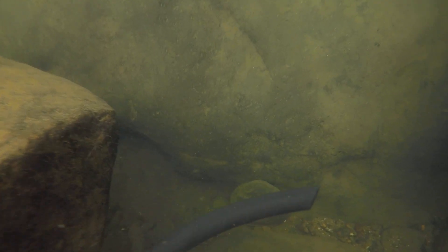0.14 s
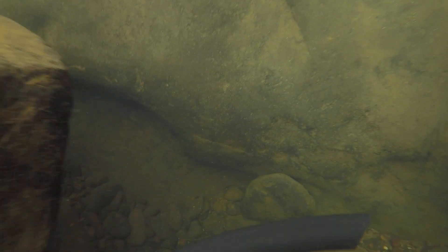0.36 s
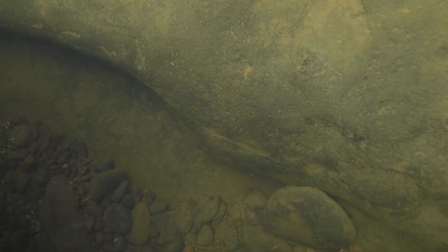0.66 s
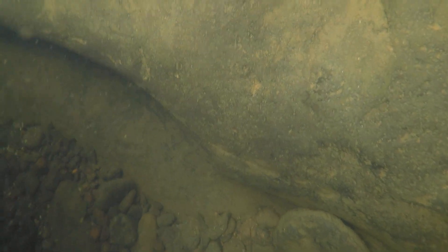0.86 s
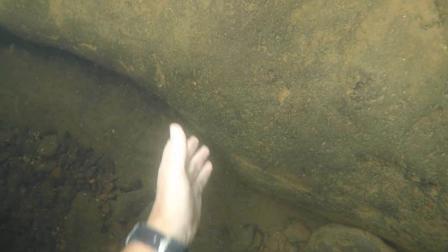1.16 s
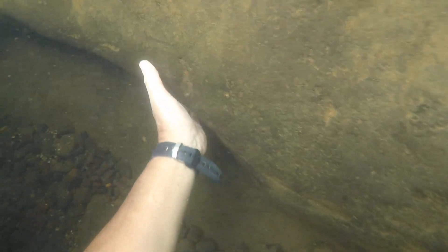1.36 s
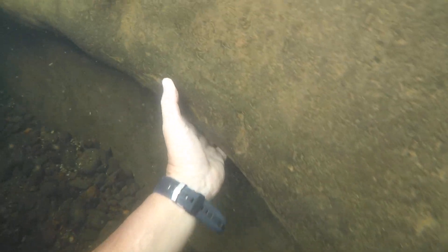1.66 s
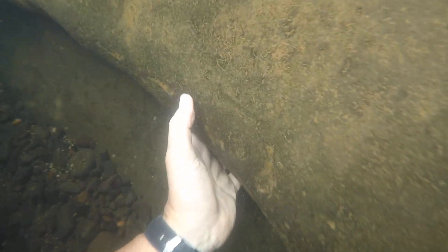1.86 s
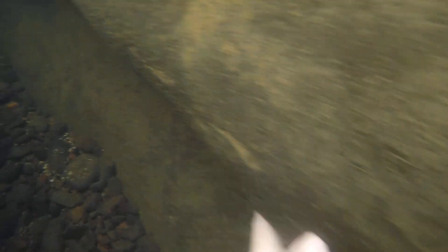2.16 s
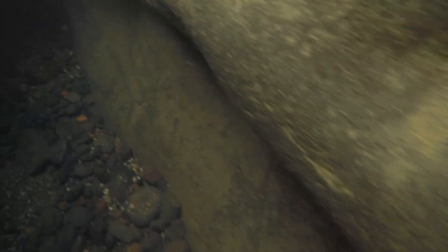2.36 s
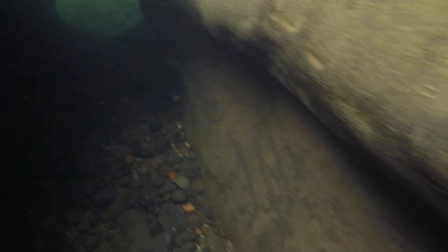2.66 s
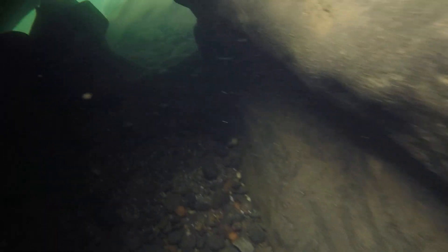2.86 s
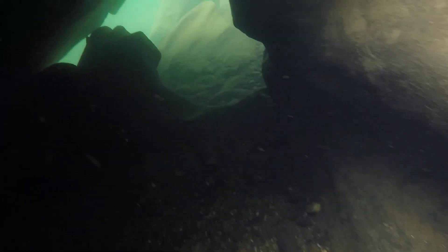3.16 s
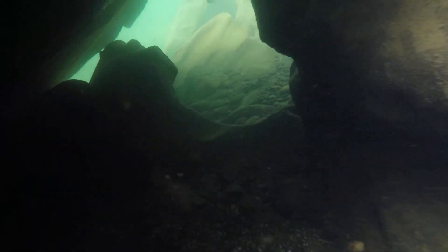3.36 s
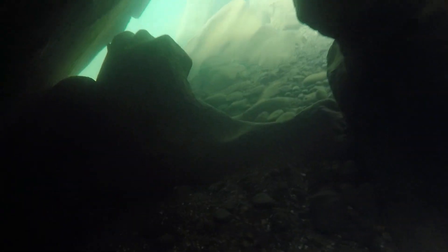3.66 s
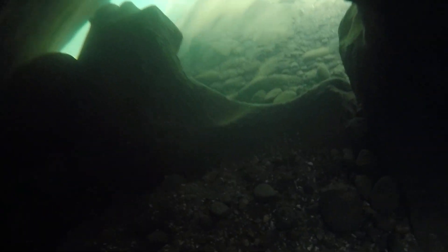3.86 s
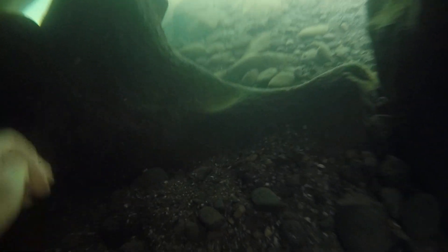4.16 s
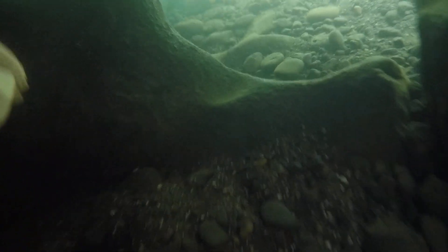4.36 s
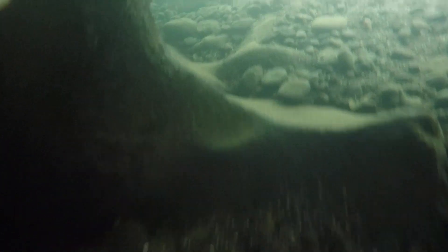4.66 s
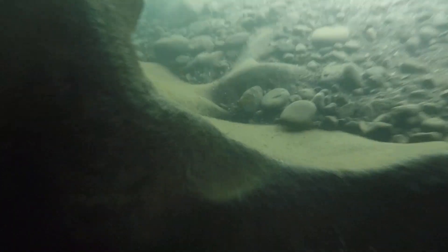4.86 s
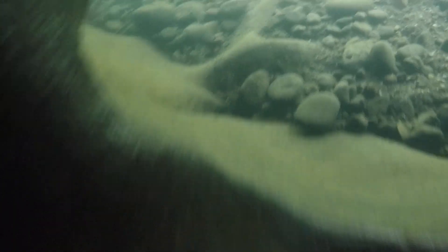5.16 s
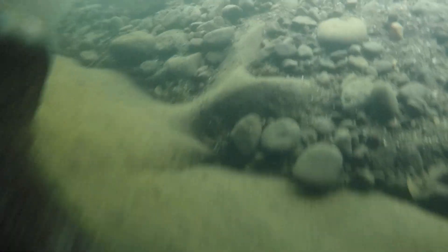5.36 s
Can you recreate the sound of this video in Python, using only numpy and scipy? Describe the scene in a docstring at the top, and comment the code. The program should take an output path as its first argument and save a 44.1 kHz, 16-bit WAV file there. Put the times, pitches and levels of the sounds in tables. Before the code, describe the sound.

Underwater inside a sealed housing: low river turbulence, bubbling gurgles and hollow bumps, quiet at first, then crowded with hard clacks and deep thuds.

```python
"""A camera in a sealed housing is carried under water through a river current between boulders.
From the start, coloured noise makes the turbulence rumble and hiss while damped sines gurgle in the flow.
Knocks ring the air pockets as damped sines and scrape as noise through shell modes; grit soon ticks on the port.
The hiss later changes colour. Both channels share all but the highest hiss at first, then the sound widens
once a hand works on the housing."""
import sys
import numpy as np
from scipy import signal
from scipy.fft import rfft, irfft
from scipy.io import wavfile
from scipy.ndimage import uniform_filter1d

SR = 44100
rng = np.random.default_rng(int(sys.argv[2]) if len(sys.argv) > 2 else 0)


def waveform_to_disk(signal):
    """Save audio, clipped to [-1, 1], as 16-bit WAV at the path in sys.argv[1]."""
    frames = np.transpose(np.atleast_2d(signal))
    scaled = np.clip(frames, -1, 1) * 32767
    samples = np.round(scaled).astype(np.int16)
    wavfile.write(sys.argv[1], SR, samples)


N = 242991
T = np.arange(N) / SR  # s
HZ = np.maximum(np.arange(N // 2 + 1) * SR / N, 1)  # frequency axis, kept above zero for logarithms


def undb(db):
    """Decibels to gain."""
    return 10 ** (np.asarray(db) / 20)


def shape(table):
    """Gain on the frequency axis, drawn through (f/Hz, level/dB) points on a log frequency scale."""
    hz, db = np.transpose(table)
    return undb(np.interp(np.log(HZ), np.log(np.maximum(hz, 1)), db))


def automation(table):
    """Curves over the whole scene from a table whose first column is t/s."""
    s, *columns = np.transpose(table)
    return [np.interp(T, s, column) for column in columns]


def decay(x, seconds):
    """One-pole tail: each impulse dies away exponentially with this time constant."""
    return signal.lfilter([1], [1, -np.exp(-1 / (seconds * SR))], x)


def walk(rate):
    """Random levels held 1 / rate s and slewed twice; spread near 1."""
    hold = int(SR / rate)
    steps = np.repeat(rng.standard_normal(N // hold + 1), hold)
    return 1.4 * uniform_filter1d(uniform_filter1d(steps, hold), hold)[:N]


def eddies(spectrum_gain, lo_hz, hi_hz, flicker_db, rate):
    """Turbulence as coloured noise, rms 1, whose five overlapping bands flicker each on its own."""
    spectrum = rfft(rng.standard_normal(N)) * spectrum_gain
    centres = np.geomspace(lo_hz, hi_hz, num=5)
    step = np.log(centres[1] / centres[0])
    out = 0
    for hz in centres:
        band = np.clip(1 - np.abs(np.log(HZ / hz)) / step, 0, 1)
        out = out + irfft(spectrum * band, N) * undb(flicker_db * walk(rate))
    return out / np.sqrt(np.mean(out ** 2))


def add(out, s, db, hz, t60, rise, pan_db=0.):
    """Adds one damped sine with a rounded onset, cut after at most 0.6 s, to both channels."""
    t = np.arange(int(min(t60, .6) * SR) + 2) / SR
    env = (1 - np.exp(-t / rise)) ** 2 * np.exp(-np.log(1000) * t / t60)
    ring = undb(db) * env / env.max() * np.sin(2 * np.pi * hz * t)
    i = int(s * SR)
    panned = ring * undb([[pan_db / 2], [-pan_db / 2]])
    out[:, i:i + len(t)] += panned[:, :N - i]


# a ridge in the hiss slides down, rises briefly and swells, then sinks and fades:
# t/s, f/Hz, level/dB against the hiss
HISS_RIDGE = [(0, 9800, 0), (.2, 9000, -1.5), (.4, 8100, -15), (1.3, 7970, -15), (2.1, 8100, -11),
              (2.25, 8400, -6), (2.4, 8100, -27), (3.1, 7650, -30)]


def ridge():
    """Slow noise shifted up to a moving centre frequency: a narrow band within the hiss."""
    hz, db = automation(HISS_RIDGE)
    slow = irfft(rfft(rng.standard_normal((2, N))) / (1 + (HZ / 520) ** 2), N)
    phase = 2 * np.pi * np.cumsum(hz) / SR
    return undb(db) * (slow[0] * np.cos(phase) + slow[1] * np.sin(phase)) / np.std(slow)


# colour of the hiss before and after the change: f/Hz, relative level/dB per Hz
HISS_BEFORE = [(1530, 0.5), (2600, -3.5), (2760, -7), (3000, -8.5), (3280, -10.5), (4620, -6.5),
               (7740, -8.5), (8460, -13), (9610, -9.5), (12000, -19.5), (13900, -24), (15500, -50)]
HISS_AFTER = [(1530, 9.5), (2600, -2), (3020, -4), (3580, -7), (3920, -4), (4620, -5.5), (6820, -1.5),
              (8210, -6.5), (9830, -6), (13200, -16), (15500, -25)]
COLOUR_CHANGE_S = (3.06, 3.38)


def hiss():
    """Fine turbulence: two noise colours crossfaded at equal power, with the ridge on top."""
    after = np.interp(T, COLOUR_CHANGE_S, [0, 1])
    out = np.sqrt(1 - after) * eddies(shape(HISS_BEFORE), 2100, 19000, 0.96, 8.9)
    out = out + np.sqrt(after) * eddies(shape(HISS_AFTER), 1700, 24000, 0.57, 12.0)
    return out + ridge()


# slowest pressure swings: f/Hz, relative level/dB per Hz
SWAY_COLOUR = [(4.7, -39), (8.0, 0), (27, -5), (50, -13.5), (65, -18.5), (110, -120)]


def sway():
    """The deepest turbulence, mostly below 50 Hz."""
    return eddies(shape(SWAY_COLOUR), 7.8, 60, 0.67, 15.0)


# turbulence on the shell: f/Hz, relative level/dB per Hz
RUMBLE_COLOUR = [(24, -43), (40, -4.5), (105, -6), (260, -20.5), (340, -26), (570, -120)]


def rumble():
    """Low turbulence on the shell, with the strongest flicker."""
    return eddies(shape(RUMBLE_COLOUR), 12.3, 465, 2.83, 8)


# middle of the flow noise: f/Hz, relative level/dB per Hz
RUSH_COLOUR = [(88, 14), (150, -4), (269, -9), (304, -7), (435, -8.5), (471, -12.5), (552, -11), (639, -18),
               (701, -14.5), (1600, -22), (3600, -43), (4680, -82), (7920, -120)]


def rush():
    """Middle-pitched turbulence of the flow."""
    return eddies(shape(RUSH_COLOUR), 150.5, 4100, 1.16, 19)


GURGLE_PER_S, BLIP_SHARE = 160, .25  # mean density; share of gurgles that also blip higher


def gurgle():
    """Air pockets ring as damped sines at random times, pitches and sizes; rms 1."""
    out = np.zeros((2, N))
    for when, pitch, size, blip in rng.random((int(GURGLE_PER_S * N / SR), 4)):
        s = when * N / SR
        add(out, s, 13.4 * size, 400 + 260 * pitch, .06, .003)
        if blip < BLIP_SHARE:
            add(out, s, 12. * pitch - 6, 900 + 900 * size, .03, .0015)
    return out[0] / np.sqrt(np.mean(out ** 2))


# flow past the shell: t/s, hiss level/dB, rush level/dB
FLOW_LEVELS = [(0, -80, -60), (.4, -71, -56.5), (.9, -64.5, -45), (1.5, -58.5, -44.5), (2.1, -58.5, -41),
               (2.9, -58.5, -42.5), (3.7, -57.5, -42), (4.1, -59, -43), (4.4, -58, -39.5),
               (4.7, -57, -40.5), (4.83, -60.5, -37), (5, -60.5, -46.5), (5.25, -59, -39.5),
               (5.51, -59, -40.5)]
# buffeting of the housing: t/s, sway level/dB, rumble level/dB
BUFFET_LEVELS = [(0, -50.5, -56), (.4, -44, -49), (.85, -39, -38.5), (1.05, -36, -33.5), (1.3, -42, -41),
                 (1.55, -44.5, -45.5), (1.9, -34, -34), (2.3, -33, -36.5), (2.7, -35, -36), (3.2, -33, -37),
                 (3.6, -33.5, -34.5), (4.08, -29.5, -38.5), (4.26, -23.5, -53), (4.5, -25, -49.5),
                 (4.65, -31, -56), (4.76, -17.5, -22), (4.85, -24, -32.5), (5.2, -21.5, -50.5),
                 (5.51, -22.5, -33)]
GURGLE_DB = -12  # against the rush


def current():
    """Layers the water noises at their moving levels; flow and knocks add gurgle by power."""
    hiss_db, rush_db = automation(FLOW_LEVELS)
    sway_db, rumble_db = automation(BUFFET_LEVELS)
    water = undb(hiss_db) * hiss()
    water = water + undb(sway_db) * sway()
    water = water + undb(rumble_db) * rumble()
    water = water + undb(rush_db) * rush()
    return water + np.hypot(undb(GURGLE_DB + rush_db), stirred()) * gurgle()


# shoves that rock the whole housing: t/s, peak level/dB, f/Hz, t60/s
HOUSING_SHOVES = [(0.765, -22.5, 132, 0.16), (0.889, -19.5, 106, 0.066), (0.997, -24.5, 53.5, 0.078),
                  (4.287, -21.5, 118, 0.12), (4.719, -5.5, 37.4, 0.27), (4.78, -13, 21.2, 0.051),
                  (4.96, -14.5, 112.7, 0.098), (5.335, -14, 112.5, 0.052)]


def shoves():
    """Low damped sines with an onset that scales with the period."""
    rocking = np.zeros((2, N))
    for s, db, hz, t60 in HOUSING_SHOVES:
        add(rocking, s, db, hz, t60, 0.27 / hz)
    return rocking


# shell resonances: f/Hz, width/Hz, relative level/dB
SHELL_MODES = [(380, 110, 7.5), (554, 118, 14.5), (870, 400, -11.5), (1330, 200, -5.5), (1900, 170, -54),
               (2630, 430, -44)]
DRAG_DB, DRAG_S = -14.5, 0.017  # the scrape drags on: level against the blow, time to die away


def shell_scrape(blows):
    """Noise bursts with a short and a dragging tail ring the modes of the shell."""
    scrape = decay(blows, 0.0037) + undb(DRAG_DB) * decay(blows, DRAG_S)
    scrape = decay(scrape, 0.00088) / (0.002 * SR)  # rounds the attack
    # the scrape is partly its own at each microphone
    both, own = scrape * rng.standard_normal((2, N))
    modes = sum(undb(db) / (1 + 1j * (HZ ** 2 - hz ** 2) / (HZ * width)) for hz, width, db in SHELL_MODES)
    modes = modes / (1 + (HZ / 2400) ** 6)
    return undb(15.0) * irfft(rfft(both + 0.73 * np.array([own, -own])) * modes, N)


def treble_crack(blows):
    """A faint, short burst of band-passed noise leaks from hard blows."""
    crack = decay(blows, 0.006) * rng.standard_normal(N)
    return signal.sosfilt(signal.butter(N=2, Wn=[2800, 6500], btype="band", fs=SR, output="sos"), crack)


# knocks on the shell: t/s, low ring level/dB, low ring f/Hz, low ring t60/s,
# high ring level/dB, high ring f/Hz, hardness level/dB, left minus right/dB (heard only once wide)
SHELL_KNOCKS = [(.012, -41, 563, 0.098, -49, 836, -51.5, 0), (0.063, -52, 607, 0.1, -60, 1240, -71, 4),
                (.174, -64, 540, .05, -64, 1590, -63, 0), (.2, -51.5, 538, 0.14, -70, 2110, -67, 0),
                (.313, -53, 311, 0.078, -59, 1900, -50, 0), (0.537, -55, 500, .03, -50, 1090, -54, 0),
                (.547, -51, 347, 0.046, -49, 1760, -52, 0), (.699, -47, 251, .08, -48.5, 1410, -65, 0),
                (.865, -42, 560, 0.036, -50, 1420, -56, 0), (.934, -30, 537, 0.23, -40, 1400, -37.5, 0),
                (.997, -24.5, 535, 0.066, -42, 1420, -35, 0), (1.017, -21, 545, 0.013, -37, 880, -43, 0),
                (1.09, -16, 490, 0.04, -48, 990, -61, 0), (1.153, -18.5, 513, 0.053, -49, 920, -59, 0),
                (1.174, -24, 570, 0.025, -56, 950, -54, 0), (1.203, -18, 547, 0.032, -50, 915, -56, 0),
                (1.289, -29.5, 440, 0.067, -39, 930, -44, 0), (1.324, -41, 610, .056, -52, 910, -33, 0),
                (1.373, -30.5, 598, 0.092, -49, 1400, -52, 0), (1.433, -22, 515, 0.027, -59, 1380, -40, 0),
                (1.472, -33.5, 455, 0.22, -61, 880, -48, 0), (1.567, -28, 540, 0.051, -59, 999, -44, 0),
                (1.609, -25.5, 454, 0.057, -41.5, 2770, -32.5, 0),
                (1.777, -41, 434, 0.11, -41, 1090, -41.5, 0), (1.822, -34.5, 426, 0.11, -60, 950, -42.5, 0),
                (2.115, -38, 647, .04, -46, 950, -50, 0), (2.21, -35.5, 446, 0.12, -55, 960, -46, 2),
                (2.734, -61, 573, 0.051, -37, 1730, -40.5, 0), (2.75, -37.5, 805, .06, -29.5, 970, -42, 0),
                (3.633, -23, 494, .052, -44, 925, -38.5, 0),
                (3.82, -27.5, 584, 0.059, -45.5, 1730, -42, -10),
                (3.914, -35, 598, 0.11, -49, 1590, -49, -8), (3.937, -33, 451, 0.11, -33, 1250, -43.5, -4),
                (4.058, -21.5, 601.5, 0.15, -29, 2450, -25.5, -3),
                (4.168, -33, 440, 0.13, -45, 1480, -37, 0), (4.193, -28, 374, 0.12, -31, 2230, -20.5, -9),
                (4.256, -26.5, 385, 0.13, -21, 1134, -32, -7.5),
                (4.303, -30, 371, .12, -25, 1654, -26, -10), (4.381, -23, 565, 0.022, -41, 1400, -46, -1),
                (4.394, -31.5, 383, 0.15, -25.5, 905, -35, -11.5),
                (4.435, -41, 503, 0.052, -38, 1440, -39, 0),
                (4.555, -13, 538, 0.031, -26.5, 1610, -27.5, -1),
                (4.661, -28.5, 635, 0.1, -49, 1510, -37.5, 2),
                (4.737, -38, 263, 0.077, -44, 1580, -30.5, 4),
                (4.758, -14.5, 557, 0.014, -25, 866, -27.5, -13),
                (4.77, -21.5, 381, 0.033, -33.5, 970, -44, -6),
                (4.802, -24, 452, 0.11, -21, 1510, -24.5, 8), (4.817, -27.5, 449, 0.18, -31, 970, -21, 7),
                (4.841, -22, 635, 0.063, -34, 890, -23, 0), (4.869, -44, 587, 0.084, -41, 1470, -45, 9),
                (4.91, -20.5, 510, .03, -36.5, 2184, -20.5, -25.5),
                (4.93, -25, 390, 0.037, -28.5, 2005, -26, 15), (4.957, -23.5, 455, 0.11, -25, 2020, -24, 2),
                (4.987, -35, 444, 0.095, -47, 976, -28.5, 6),
                (5.171, -33, 554, 0.037, -40, 860, -34.5, -10),
                (5.243, -28.5, 287, 0.23, -48, 925, -59, -3),
                (5.281, -29.5, 654, 0.03, -36.5, 1160, -47, 2),
                (5.332, -19.5, 488, 0.033, -18, 1495, -19.5, 12.5),
                (5.3537, -28, 530, 0.034, -17.5, 1100, -18.5, 6),
                (5.373, -19, 480, .03, -20.5, 1114, -27, 7),
                (5.406, -36.5, 272.6, 0.81, -30, 2130, -30, -6),
                (5.427, -10, 599, 0.14, -20.5, 1390, -41.5, 0),
                (5.454, -43, 590, 0.061, -32.5, 1590, -38, -5)]
# after a hard blow the large pocket starts later: hardness level/dB, delay/s
LOW_RING_DELAY = [(-40, 0.00026), (-21, 0.0031)]
# a light touch lets the high ring last: high ring minus hardness/dB, t60/s
HIGH_RING_T60 = [(0, 0.026), (8, 0.029), (18, 0.083)]
CLACK_DB, CLACK_HZ, CLACK_SPREAD_HZ = -20.5, 1875, 273  # against the hardness; lowest pitch and its scatter


def knocks():
    """Each blow rings a large and a small air pocket, clacks, cracks and scrapes."""
    out, scrape, crack = np.zeros((2, N)), np.zeros(N), np.zeros(N)
    for row, (late, detune, pitch) in zip(SHELL_KNOCKS, rng.random((len(SHELL_KNOCKS), 3))):
        s, db, hz, t60, high_db, high_hz, hard_db, pan_db = row
        clack_db = hard_db + CLACK_DB
        delay = np.interp(hard_db, *np.transpose(LOW_RING_DELAY))
        high_t60 = np.interp(high_db - hard_db, *np.transpose(HIGH_RING_T60))
        add(out, s + delay, db, hz, t60, .002, pan_db)
        # a neighbouring pocket answers a moment later, a little out of tune
        add(out, s + 0.00806 + 0.0133 * late, db - 17, hz * (.88 + 0.215 * detune), .07, .003, pan_db)
        add(out, s, high_db, high_hz, high_t60, .0008, pan_db)
        add(out, s, clack_db, CLACK_HZ + CLACK_SPREAD_HZ * pitch, .035, .0006, pan_db)
        scrape[int(s * SR)] = undb(hard_db)
        crack[int(s * SR)] = undb(clack_db - 8)
    out = out + shell_scrape(scrape) - shoves()
    # the thick shell muffles all but the crack
    muffle = signal.butter(N=6, Wn=3200, fs=SR, output="sos")
    return treble_crack(crack) + signal.sosfilt(muffle, out)


STIRRED_DB, SETTLE_S = -24, .09  # against the knock's low ring; time for its power to die away


def stirred():
    """Gain of the gurgle that knocks leave behind: each blow adds power that dies away."""
    s, db = np.transpose(SHELL_KNOCKS)[:2]
    power = np.zeros(N)
    power[(s * SR).astype(int)] = undb(2 * (db + STIRRED_DB))
    return np.sqrt(decay(power, SETTLE_S))


# grit ticking on the port: t/s, tick level/dB before the high-pass
GRIT_TICKS = [(.5072, -49), (.7771, -51), (.908, -46), (.9238, -48), (.9344, -49), (1.0166, -48.5),
              (1.1782, -45), (1.2401, -49), (1.438, -42.5), (1.469, -49), (1.7792, -39), (1.816, -38),
              (2.1124, -44), (2.1233, -35.5), (2.2313, -46), (2.4788, -49), (2.7613, -42), (2.832, -44),
              (2.8501, -35.5), (3.5339, -51), (4.1784, -51.5), (5.3317, -43.5), (5.354, -51), (5.4051, -44)]
TICK_HZ, TICK_SPREAD_HZ = 8130, 1400  # lowest pitch and its scatter
# faint ticks fall at random over this span; level before the high-pass
FINE_GRIT_S, FINE_GRIT_COUNT, FINE_GRIT_DB = (.4, 1.8), 12, -65


def grit_snaps():
    """Each grain or slip is a cluster of tiny high damped sines, high-passed."""
    snaps = np.zeros((2, N))
    slips = [(s + k / rate, db) for s, rate, count, db, _, _ in GRAIN_STUTTERS for k in range(int(count))]
    fine = [(s, FINE_GRIT_DB) for s in rng.uniform(*FINE_GRIT_S, size=FINE_GRIT_COUNT)]
    grains = list(GRIT_TICKS) + slips + fine
    for (s, db), pitch in zip(grains, rng.random(len(grains))):
        add(snaps, s, db, TICK_HZ + TICK_SPREAD_HZ * pitch, .007, .0003)
        add(snaps, s, db - 5.5, 10500, .004, .0003)
        add(snaps, s, db - 15, 12800, .004, .0003)
        add(snaps, s + 0.00033, db - 7.5, 8150, .012, .0005)
    return signal.sosfilt(signal.butter(N=4, Wn=7300, btype="high", fs=SR, output="sos"), snaps)


# a grain stutters across the port: t/s, slips per s, slips (whole part counts),
# snap level/dB before the high-pass, first dull tap level/dB, dull change per slip/dB
GRAIN_STUTTERS = [(2.066, 183, 3.5, -46.5, -35.5, 4), (2.2042, 130, 5.7, -53, -30, -4.5),
                  (2.6635, 108, 4, -47.5, -28.5, -2), (2.962, 116, 2, -60, -51, 11)]


def stutter_taps():
    """Each slip of a stuttering grain also taps dully: three short damped sines."""
    out = np.zeros((2, N))
    for s, rate, count, _, dull_db, change_db in GRAIN_STUTTERS:
        for k in range(int(count)):
            slip_s, db = s + k / rate, dull_db + k * change_db
            add(out, slip_s, db, 1540, .013, .0006)
            add(out, slip_s, db - 11.0, 1850, .012, .0005)
            add(out, slip_s, db - 18, 2300, .01, .0005)
    return out


# tiny bubbles: t/s, ring level/dB, f/Hz
BUBBLE_PINGS = [(3.7615, -54, 4850), (3.8134, -57, 5940), (3.8787, -51, 5100), (3.9097, -53, 6840),
                (4.0359, -49.5, 5710), (4.058, -48, 7540), (4.1737, -49.5, 6050), (4.801, -52, 5750),
                (4.9924, -42, 3540), (5.0486, -54, 6110), (5.382, -45, 3200), (5.4057, -36.5, 6770)]


def bubbles():
    """Tiny bubbles ping as short damped sines, each opened by a louder, wide-band click."""
    out = np.zeros((2, N))
    for s, db, hz in BUBBLE_PINGS:
        add(out, s, db, hz, .012, .0006)
        add(out, s, db + 5, hz, .002, .0001)
    return out


def colour(x, gain):
    """Filters by a gain on the frequency axis; the mirrored copy keeps the ends free of clicks."""
    return irfft(rfft(np.r_[x, x[::-1]]) * np.repeat(gain, 2)[:N + 1], 2 * N)[:N]


# spread of the blows once wide: f/Hz, relative side level/dB
BLOW_SPREAD = [(60, -8), (110, 2), (200, -6), (380, -19), (700, 3.5), (1290, 10), (2380, 4), (4400, 1),
               (8120, 8), (15000, -7.5)]
# spread of the water once wide: f/Hz, relative side level/dB
WATER_SPREAD = [(30, -10), (110, -5), (300, -12.5), (800, 6), (1400, 0.5), (2500, -4.5), (6000, -3),
                (13000, -2.5)]
WIDE_S = (3.72, 3.85)  # left and right part over this span


def scene():
    """Mid is shared; once wide, blows differ in phase left and right and separate eddies fill the side."""
    wide = np.interp(T, WIDE_S, [0, 1])
    left, right = knocks() + grit_snaps() + stutter_taps() + bubbles()
    blows, lean = (left + right) / 2, (left - right) / 2
    # a quarter-turn of phase spreads the blows
    blow_side = lean + undb(-4.0) * colour(blows, 1j * shape(BLOW_SPREAD))
    mid = blows + current()
    other = current()
    side = wide * (blow_side + undb(-0.5) * colour(other, shape(WATER_SPREAD)))
    # the highest hiss differs left and right even before the sound widens
    side = side + (1 - wide) * undb(-4.5) * colour(other, HZ > 11700)
    return np.array([mid + side, mid - side])


TOP_HZ = 15100


def record(dry):
    """A steep low-pass cuts the top; the last 6 ms fade out."""
    fade = np.minimum((T[-1] - T) / .006, 1)
    return fade * signal.sosfilt(signal.ellip(10, .2, 70, TOP_HZ, fs=SR, output="sos"), dry)


dry = scene()
out = record(dry)
waveform_to_disk(out)
```